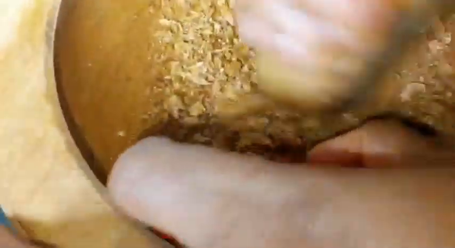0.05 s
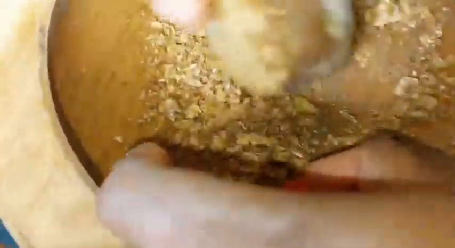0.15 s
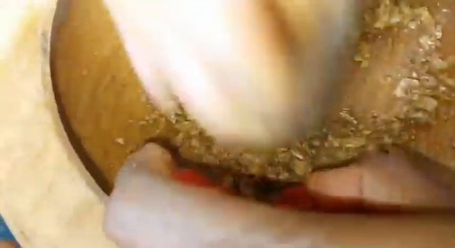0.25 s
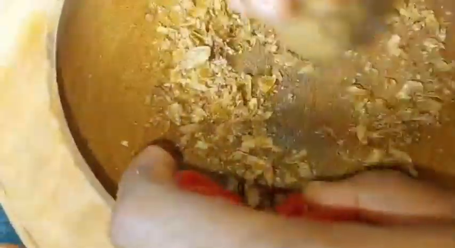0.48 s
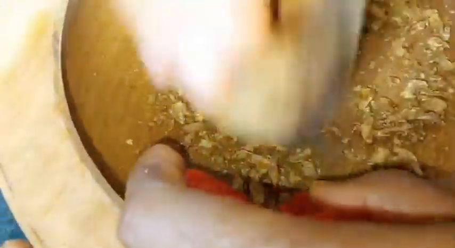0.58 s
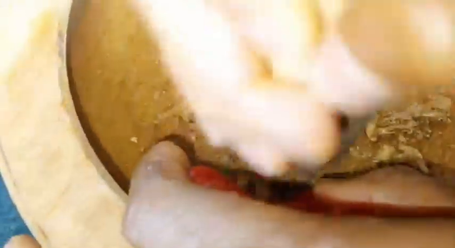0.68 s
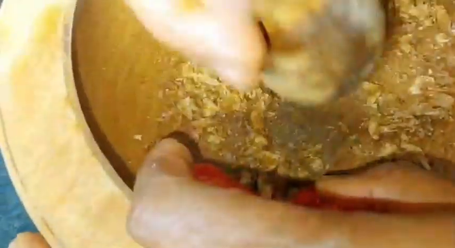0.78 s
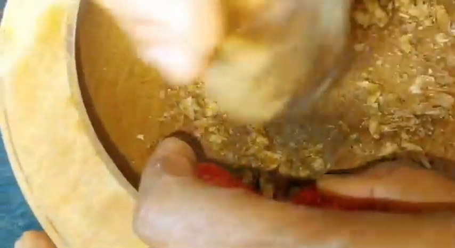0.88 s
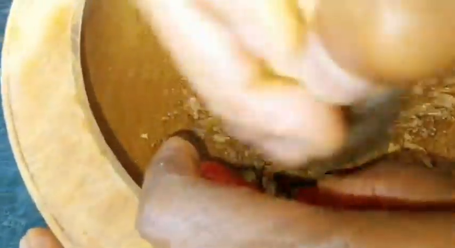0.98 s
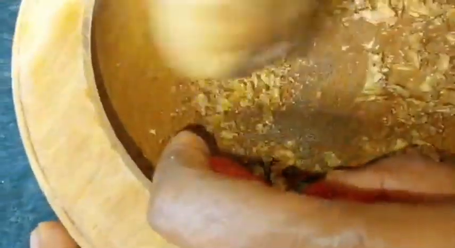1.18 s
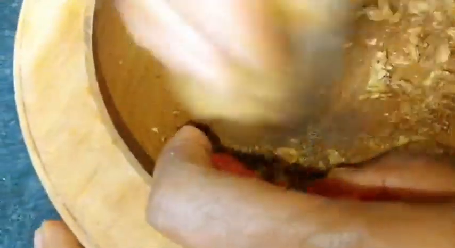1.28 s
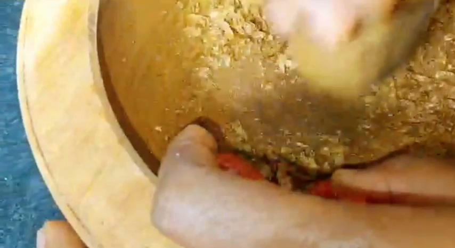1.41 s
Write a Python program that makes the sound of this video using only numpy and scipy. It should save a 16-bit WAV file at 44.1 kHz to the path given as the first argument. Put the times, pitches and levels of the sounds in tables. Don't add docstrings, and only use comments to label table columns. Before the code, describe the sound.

Steady wooden pounding, about three blows a second: flakes crack, the bowl knocks and the counter thumps, dishes and a spoon jingle, the pestle scrapes between blows, over low appliance rumble and hiss, heard close.

```python
import sys
import numpy as np
from scipy import signal
from scipy.fft import rfft, irfft, next_fast_len
from scipy.io import wavfile
from scipy.ndimage import map_coordinates

SR = 44100
rng = np.random.default_rng(int(sys.argv[2]) if len(sys.argv) > 2 else 0)


def gain_from_db(level_db):
    decades = np.asarray(level_db, float) / 20
    return 10 ** decades


def master(y):
    cut = np.clip(np.atleast_2d(y).T, -1, 1)
    pcm = np.round(cut * 32767)
    wavfile.write(sys.argv[1], SR, pcm.astype(np.int16))


N = 63945
PAD = SR // 4
T = np.arange(SR) / SR
CONTACT_S, STEEL_RISE_S = 0.0013, 0.003

# (f/Hz, left-right likeness)
PORT_LIKENESS = [(60, 0.99), (150, 0.96), (300, 0.86), (650, 0.16), (1500, .05)]


def along(points, hz):
    f, v = np.transpose(points)
    return np.interp(np.log(hz + 1), np.log(f + 1), v)


def filtered(x, response):
    m = next_fast_len(x.shape[-1] + 8192)
    spectrum = rfft(x, m) * response(np.fft.rfftfreq(m, 1 / SR))
    return irfft(spectrum, m)[..., :x.shape[-1]]


def unit(x):
    return x / np.sqrt(np.mean(x ** 2) + 1e-20)


def blend(pair, alike):
    def mid_side(hz):
        turn = np.arccos(np.clip(along(alike, hz), -1, 1)) / 2
        return np.array([np.cos(turn), np.sin(turn)])

    mid, side = filtered(pair, mid_side)
    return np.array([mid + side, mid - side])


def peaks(table):
    def response(f):
        total = 0
        for k, (hz, width, db) in enumerate(table):
            damping = 1j * f * width
            total = total + (-1) ** k * gain_from_db(db) * damping / (hz * hz - f * f + damping)
        return total
    return response


def ring(hz, db, t60, late_s, pan_db=0, lead_s=0, rise_s=CONTACT_S):
    half = SR // 2
    port_lead = np.array([[lead_s], [0]]) - max(lead_s, 0)
    t = np.maximum(T[:half] - late_s + port_lead, 0)
    level_db = db + np.array([[.5], [-.5]]) * pan_db - 60 * t / t60
    wave = gain_from_db(level_db) * np.sin(2 * np.pi * hz * t) * (1 - np.exp(-t / rise_s))
    return np.pad(wave, ((0, 0), (0, SR - half)))


def grit(response, per_s, spread_db, shared, size=SR):
    struck = rng.random(size) < per_s / SR
    cracks = rng.standard_normal((3, size)) * struck * gain_from_db(spread_db * rng.standard_normal(size))
    dust = 0.29 * rng.standard_normal((2, size))
    return unit(filtered(shared * cracks[2] + cracks[:2] + dust, response))


def add(track, s, x):
    part = track[:, PAD + round(s * SR):][:, :x.shape[1]]
    part += x[:, :part.shape[1]]


def floor():
    # (f/Hz, level/dB)
    rumble = [(18, -25), (30, 6), (109, -5.5), (182, -1), (271, -13), (385, -5.5), (540, -9.5),
              (598, -15.5), (1000, -18.5), (1300, -59.5), (2200, -120)]
    # (f/Hz, level/dB)
    hiss = [(410, -54), (700, -32), (874, -12), (957, -10.5), (1400, -4), (1910, -1), (3390, -9),
            (12000, -8.5), (15800, -15.5)]
    sway = map_coordinates(rng.standard_normal(40), [np.arange(N) * 18 / SR])
    low = blend(rng.standard_normal((2, N)), PORT_LIKENESS)
    low = unit(filtered(low, lambda hz: gain_from_db(along(rumble, hz))))
    high = unit(filtered(rng.standard_normal((2, N)), lambda hz: gain_from_db(along(hiss, hz))))
    return low * gain_from_db(-55 + 0.98 * sway) + high * gain_from_db(-57)


def room(x, wet_db=0):
    # (f/Hz, t60/s)
    reverb = [(60, 0.17), (250, 0.24), (1000, 0.24), (4000, 0.33), (12000, 0.36)]
    room_db, first_wall_s = -9, .006
    hz, t, z = signal.stft(rng.standard_normal((2, SR // 2)), SR, nperseg=256)
    fading = z * gain_from_db(-60 * t / along(reverb, hz)[:, None])
    tail = blend(signal.istft(fading, SR, nperseg=256)[1], PORT_LIKENESS)
    tail = np.pad(tail, ((0, 0), (round(first_wall_s * SR), 0)))
    tail = tail / np.linalg.norm(tail[0])
    wet = signal.fftconvolve(x.mean(0)[None], tail, axes=1)[:, :x.shape[1]]
    return x + gain_from_db(room_db + wet_db) * wet


def spoon(db):
    # (f/Hz, level/dB, t60/s)
    modes = [(5240, -13, .08), (7960, -0.5, 0.059), (8900, -9, .08), (10400, -2, .07), (10600, 2, 0.058),
             (11120, -3, .08), (10950, -4, .09), (11970, 0, 0.091), (12700, -1, .1), (13700, -8, .07),
             (14800, -11, .06), (15600, -5, .06)]
    spread_db, scatter_s = 3, .004
    out = 0
    for hz, level, t60 in modes:
        louder, panned, late = rng.standard_normal(3)
        out = out + ring(hz, db + level + spread_db * louder, t60, scatter_s * abs(late),
                         spread_db * panned, rise_s=STEEL_RISE_S)
    return out


def loose(hz, dish_db, glass_db):
    near_hz = 150
    return dish_db * (abs(hz - 2830) < near_hz) + glass_db * (abs(hz - 9230) < near_hz)


def rattle(db, bright_db, *standing):
    # (f/Hz, width/Hz, level/dB)
    chatter = [(1243, 890, -0.5), (2160, 410, 0), (2828, 80, 5.5), (3920, 330, -5.5), (4410, 115, -1.5),
               (4836, 140, -7.5), (5570, 130, -9.5), (6217, 180, -8.5), (7890, 100, -14), (9236, 54, -8),
               (10700, 220, -23.5), (11270, 240, -28), (12300, 400, -26), (13600, 1650, -30)]
    rise_s, t60 = .0095, .11
    shape = (1 - np.exp(-(T / rise_s) ** 2)) * gain_from_db(db - 60 * T / t60)
    dishes = []
    for hz, width, level in chatter:
        tilt_db = bright_db * np.log2(hz / chatter[0][0])
        dishes.append((hz, width, level + tilt_db + loose(hz, *standing)))
    return shape * grit(peaks(dishes), per_s=9000, spread_db=1.5, shared=.3)


def nudge(hz, db, t60):
    return ring(hz, db, t60, 0, rise_s=0.11 * t60)


def scrape(length, db, mouth_hz, upper_db):
    # (f/Hz, width/Hz, level/dB)
    grind = [(420, 123, 3.5), (940, 180, 0), (3070, 480, -6.5), (3640, 230, -9), (4540, 880, -12.5)]
    mouth_width_hz, mouth_db, top_hz = 170, 7.5, 4540
    half = SR // 2
    shape = np.abs(np.sin(np.pi * np.clip(T[:half] / length, 0, 1))) ** .9
    resonances = [(hz, width, level + upper_db * (hz > mouth_hz)) for hz, width, level in grind]
    resonances = sorted(resonances + [(mouth_hz, mouth_width_hz, mouth_db)])
    wood = lambda hz: peaks(resonances)(hz) / (1 + 1j * hz / top_hz) ** 2
    return gain_from_db(db) * shape * grit(wood, per_s=2200, spread_db=3.5, shared=.4, size=half)


def steel(db, hop_s, flight_s, upper_db, *standing):
    # (f/Hz, level/dB, t60/s, left-right level/dB)
    modes = [(2062, 0, .35, 4.5), (2762, -22, .3, 0), (2868, -22, .2, 0), (3578, -14, .3, -1),
             (3910, -19, .12, 0), (4380, -17, .12, 0), (6164, -21, .09, 0), (7237, -21, .1, -7),
             (8193, -29, .1, 0), (9240, -26, .15, 0)]
    spread_db, land_loss_db, land_s = 2, 12, .006
    tone = 0
    for hz, level, t60, pan in modes:
        louder, panned = spread_db * rng.standard_normal(2)
        gain = db + level + louder + upper_db * (level < 0) + loose(hz, *standing)
        tone = tone + ring(hz, gain, t60, hop_s, pan + panned, rise_s=STEEL_RISE_S)
    landed = np.maximum(T - hop_s - flight_s, 0)
    return tone * gain_from_db(-land_loss_db * np.minimum(landed / land_s, 1) - 210 * landed)


def counter(db):
    # (f/Hz, level/dB, t60/s, arrival/ms, left-right level/dB)
    modes = [(55.2, -23.5, 0.32, 16.5, -1), (97.64, -20.5, 0.34, 2.96, -2.5), (107.6, -3, 0.14, 2.15, -1),
             (113.9, -17, 0.29, 5.73, 0), (152.3, -13, 0.17, 6.82, -2.5), (170, -9.5, 0.17, 3.75, 1.5),
             (205.5, -18.5, 0.3, 4.68, -4.5), (217.1, -12, 0.13, 4.1, 7), (262.9, -18, 0.17, 2.05, -7)]
    return sum(ring(hz, db + level, t60, ms / 1000, pan) for hz, level, t60, ms, pan in modes)


def crunch(db, ahead_s):
    # (f/Hz, level/dB)
    flakes = [(150, 4), (450, -1.5), (900, -4.5), (1400, -11), (2000, -6.5), (4500, -19.5), (7000, -23.5),
              (15800, -33)]
    crunch_db, rise_db, t60 = -31, 16.5, 0.084
    after = T - ahead_s
    shape = np.where(after < 0, rise_db * after / ahead_s, -60 * after / t60)
    cracks = grit(lambda hz: gain_from_db(along(flakes, hz)), per_s=4500, spread_db=2.5, shared=.35)
    return gain_from_db(db + crunch_db + shape) * cracks


def bowl(db, hard_db, spot_hz, first_db, slap_ms, other_hz, other_db, shift):
    # (f/Hz, level/dB, t60/s, left-right level/dB, left lead/ms)
    modes = [(318.6, 1, 0.041, -3.5, 0.091), (431, 1.5, 0.013, 1, 0.77), (470.8, -23.5, 0.13, -10, 0.085),
             (579, -23, 0.064, 12, 0.15), (598, -14.5, 0.077, -4.5, 0.33), (674, -9.5, 0.024, 9.5, 0.044),
             (779.6, -12.5, 0.024, -5, 0.38), (909, -27, 0.14, -8, 0.11), (1078, -11.5, 0.049, 3.5, 0.33),
             (1216, -12, 0.027, 11, 0.22), (1750, -18.5, 0.015, -7.5, 0.016), (1875, -19.5, 0.02, 14, .03),
             (2835, -25, 0.022, -1, 0.028)]
    spread_db, spot_db, spot_octaves = 1.5, 7.5, .2
    lag_ms, slap_db, mid_late_ms = 0.49, 3, 0.74
    near = lambda hz, centre_hz: np.exp(-(np.log2(hz / centre_hz) / spot_octaves) ** 2)
    out = 0
    for k, (hz, level, t60, pan, lead_ms) in enumerate(modes):
        hz = hz * (1 + shift / 100)
        upper = k > 0
        mid = 500 < hz < 1500
        favour_db = spot_db * near(hz, spot_hz) + other_db * near(hz, other_hz)
        tilt_db = hard_db * np.log2(hz / modes[0][0])
        knock_db, foot_db = db + favour_db + level + tilt_db + spread_db * rng.standard_normal(2) * upper
        out = out - ring(hz, knock_db + first_db * mid, t60, lag_ms / 1000, pan, lead_ms / 1000)
        if upper:
            slap_s = (slap_ms + mid_late_ms * mid) / 1000
            out = out - ring(hz, foot_db + slap_db, t60, slap_s, pan, lead_ms / 1000)
    return out


def scene():
    # (t/s, counter level/dB, bowl level/dB, hardness/dB per octave, favoured mode f/Hz)
    blows = [
        (-.1, -10.5, -5, 0, 500),
        (0.2016, -4.5, -3.5, -1, 738),
        (0.5367, -4, -3, -1.5, 730),
        (0.8292, -5.5, -12.5, 0, 287.6),
        (1.1353, -8.5, -4.5, -1, 718),
        (1.462, -13.5, -5, -7, 700),
    ]
    # (first contact's mid level/dB, slap delay/ms, second favoured f/Hz, its level/dB, shift/%)
    strikes = [(1.5, 6, 1100, -15, 0.5), (-9.5, 5.9, 1440, -4, 3.5), (-9, 5.5, 1660, 9.5, -2.5),
               (-12, 5.895, 740, 8.5, -2), (-2, 5.805, 683, 4, -2.5), (0, 5.9, 1200, 0, 0)]
    # (hop start/s, flight/s, upper steel level/dB, spoon level/dB, crunch lead/s)
    hops = [(.0105, .028, -3, -70, 0.032), (.008, 0.036, -2.5, -52.5, .024),
            (.0135, 0.024, -1.5, -50, 0.012), (0.0081, 0.033, 3.5, -63, 0.02),
            (.0095, 0.031, 0, -73, 0.014), (.0105, .028, 0, -70, 0.054)]
    # (crunch level/dB, steel level/dB, rattle level/dB, rattle brightness/dB per octave)
    loose_things = [(-12.5, -44, -44, -5), (1, -24.5, -17.5, 0), (2, -27, -20.5, 1.5),
                    (-6, -27.5, -28.5, 2.5), (-3.5, -31.5, -24.5, -3), (-22, -32, -34, 0)]
    # (dish level/dB, glass level/dB)
    standings = [(-5, 0), (-1, 0), (-1.5, 3.5), (-3, -11), (-8.5, -3.5), (0, 0)]
    # (t/s, length/s, level/dB, bowl mouth or crumb f/Hz, upper level/dB)
    scrapes = [(0.2, 0.0066, -33, 3070, 8), (0.232, 0.01, -32.5, 3100, 5.5), (0.245, 0.066, -47.5, 1790, 0),
               (0.333, 0.045, -50.5, 1740, 4), (0.526, 0.013, -37, 1590, 6), (0.599, 0.055, -37, 1720, -7),
               (0.616, 0.031, -45, 3270, 9), (0.861, 0.084, -42.5, 1710, 5), (0.948, 0.048, -49.5, 1750, 2),
               (1.176, 0.055, -40.5, 1750, 0), (1.181, 0.023, -41, 3150, 8), (1.224, 0.06, -52, 1750, 5.5),
               (1.429, 0.05, -48.5, 1350, -6)]
    # (t/s, f/Hz, level/dB, t60/s)
    nudges = [(0.298, 105.3, -32.5, 0.32), (0.416, 170, -32.5, 0.017), (0.595, 107, -34, 0.14),
              (0.787, 170, -44, 0.015), (0.95, 108.4, -27, 0.2), (1.243, 104, -30, 0.21),
              (1.333, 202, -60, 0.045)]
    track = np.zeros((2, PAD + N))
    for blow, strike, hop, things, standing in zip(blows, strikes, hops, loose_things, standings):
        s, counter_db, *knock = blow
        hop_s, flight_s, upper_db, spoon_db, ahead_s = hop
        crunch_db, steel_db, *chatter = things
        struck = counter(counter_db) + bowl(*knock, *strike) + rattle(*chatter, *standing)
        add(track, s, room(struck))
        add(track, s, room(steel(steel_db, hop_s, flight_s, upper_db, *standing), wet_db=-8))
        add(track, s - ahead_s, room(crunch(crunch_db, ahead_s)))
        add(track, s + hop_s / 2, spoon(spoon_db))
    for s, *stroke in scrapes:
        add(track, s, room(scrape(*stroke)))
    for s, *shove in nudges:
        add(track, s, nudge(*shove))
    return track[:, PAD:] + floor()


def band_limit(x):
    return signal.sosfilt(signal.butter(12, 15900, fs=SR, output="sos"), x)


def record(dry):
    x = signal.lfilter(*signal.butter(4, 43, "high", fs=SR), dry)
    x = x / (1 + np.abs(x / .98) ** 16) ** (1 / 16)
    return band_limit(x)


dry = scene()
out = record(dry)
master(out)
```